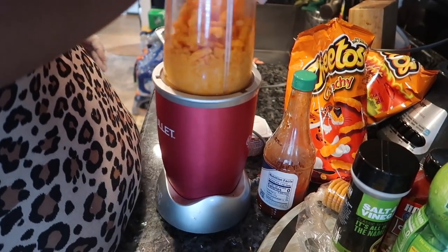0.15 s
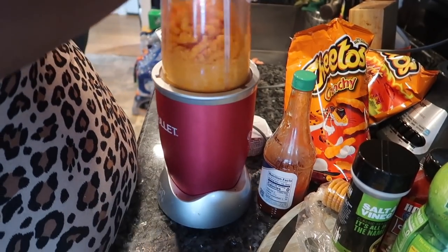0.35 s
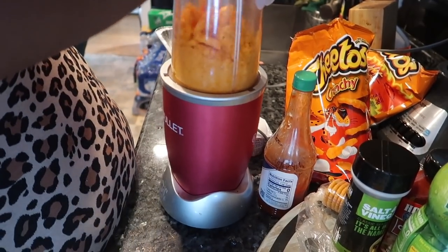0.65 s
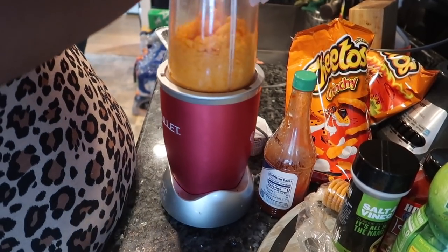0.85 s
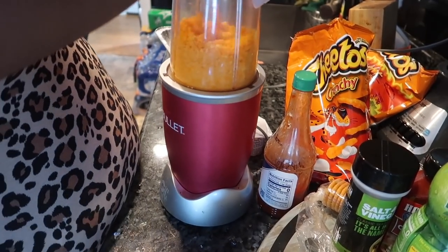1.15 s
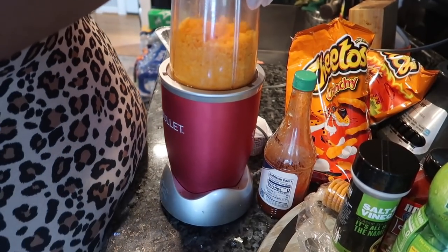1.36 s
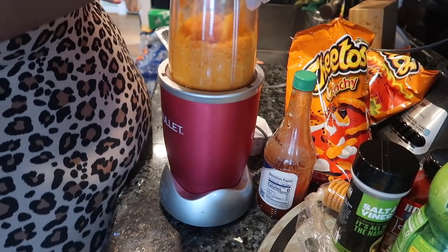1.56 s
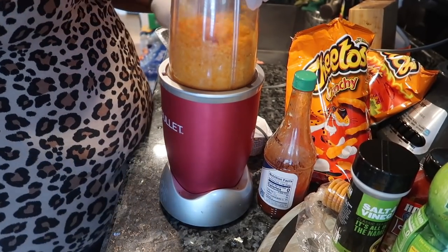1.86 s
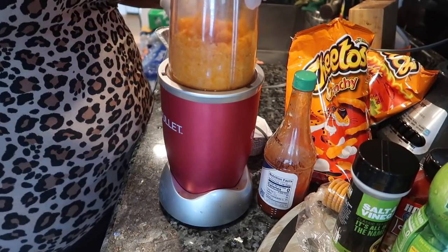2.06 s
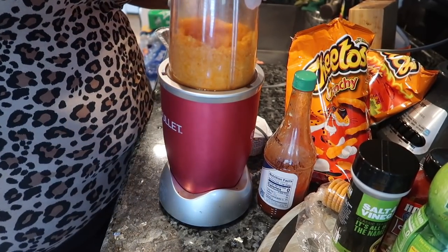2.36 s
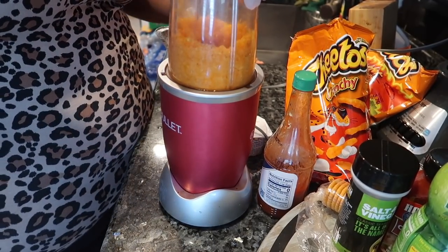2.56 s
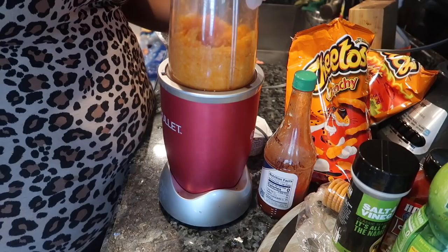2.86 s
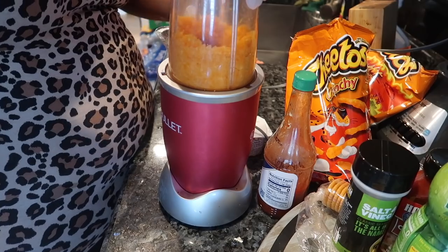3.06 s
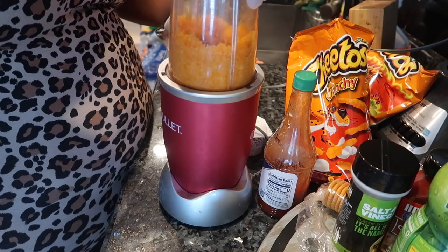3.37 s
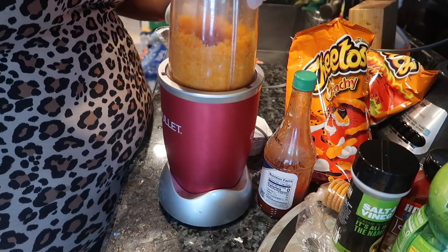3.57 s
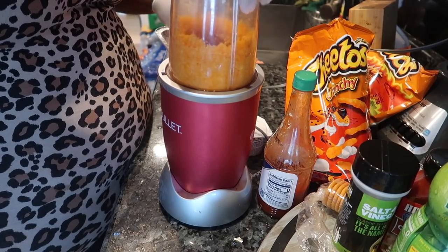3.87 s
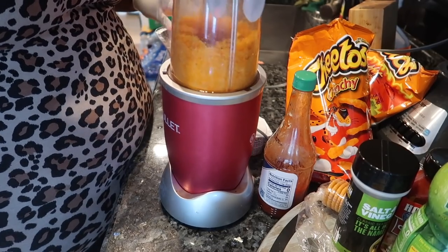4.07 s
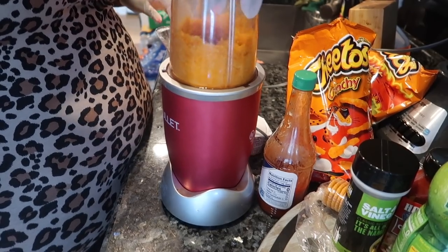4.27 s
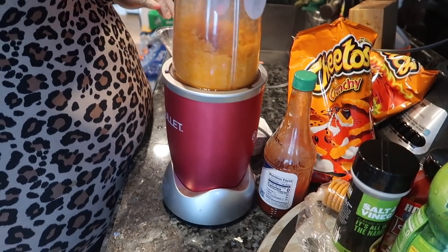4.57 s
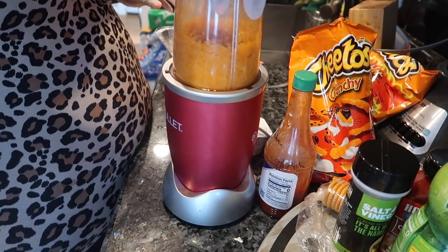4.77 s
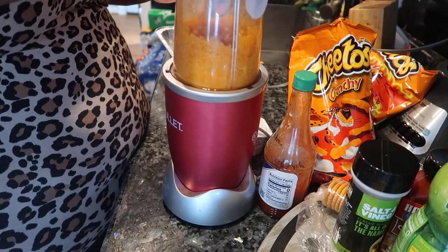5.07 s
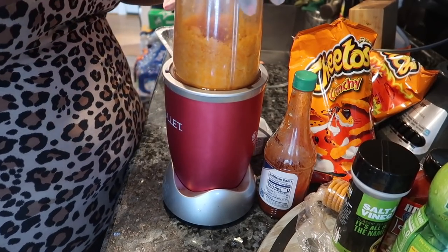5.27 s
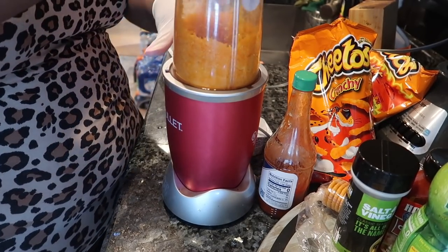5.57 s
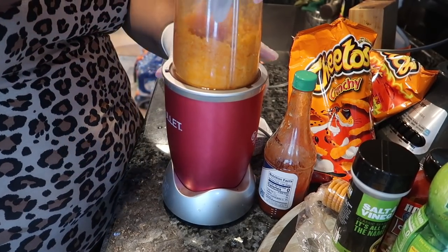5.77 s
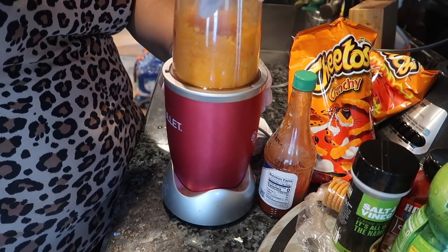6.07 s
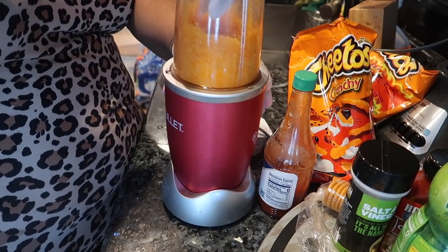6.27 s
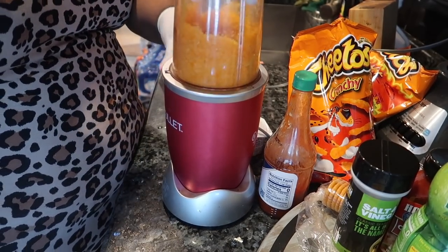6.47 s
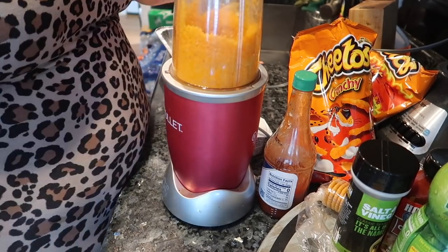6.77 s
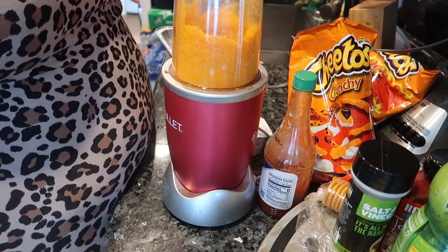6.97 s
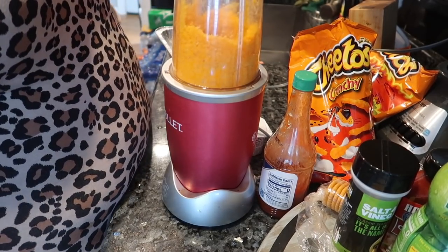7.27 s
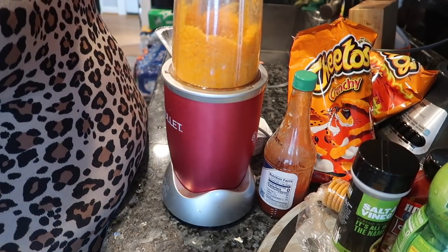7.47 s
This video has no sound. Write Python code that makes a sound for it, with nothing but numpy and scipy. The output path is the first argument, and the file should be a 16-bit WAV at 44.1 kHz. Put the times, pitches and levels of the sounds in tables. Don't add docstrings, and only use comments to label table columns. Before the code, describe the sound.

A small cup blender is already running, loud and very close to a phone on a stone kitchen counter. From 0 to 1 s the motor sags from a strained buzz to a lower pitch while dry puffed snacks crack coarsely on blade and cup. Until about 2.6 s it labours unevenly, with hard knocks, hollow plastic ringing and a dense, gritty roar. From 3 to 4.2 s the pitch climbs clearly as pieces become finer, the load lurching in quick bumps. From 4.2 to 6.1 s it runs fast and freer, smoother but fierce, with a piercing bearing whine, airy fan hiss and brief seat rattles. At about 6.2 s a sharp click and jolt mark the release; current stops and the whine glides steadily downward, roar and hiss thinning, leftover crumbs rattling softly, still spinning when it ends around 7.6 s.

```python
import sys
import numpy as np
from scipy import signal
from scipy.io import wavfile

SR = 44100
rng = np.random.default_rng(int(sys.argv[2]) if len(sys.argv) > 2 else 0)


def voltage_ratio(decibels):
    exponent = np.asarray(decibels, float) / 20
    return 10 ** exponent


def master_out(mix):
    frames = np.transpose(np.atleast_2d(mix))
    ceiling = np.clip(frames, -1, 1)
    pcm = np.round(ceiling * 32767).astype(np.int16)
    wavfile.write(sys.argv[1], SR, pcm)


N = 336384
T = np.arange(N) / SR
RELEASE_S, CUT_S = 6.17, 6.27


def noise():
    return rng.standard_normal(N)


def ramp(x):
    return np.clip(x, 0, 1)


def rms_one(x):
    return x / np.sqrt(np.mean(x ** 2) + 1e-20)


def in_time(rows):
    s, *columns = np.transpose(rows)
    return [np.interp(T, s, c) for c in columns]


def drift(rate):
    r = np.exp(-80 * np.pi * rate / SR)
    slow = signal.lfilter([1], [1, -2 * r, r * r], rng.standard_normal(N // 40 + 2002))[2000:]
    return np.interp(np.arange(N) / 40, np.arange(len(slow)), rms_one(slow))


def resonate(x, hz, width_hz):
    r = np.exp(-np.pi * width_hz / SR)
    zeros = np.array([1, 0, -1]) * (1 - r * r) / 2
    return signal.lfilter(zeros, [1, -2 * r * np.cos(2 * np.pi * hz / SR), r * r], x)


def body(x, modes, free, coasting, flicker_db=1.8):
    out = 0
    for k, (hz, width_hz, buried_db, clear_db, idle_db) in enumerate(modes):
        db = buried_db + free * (clear_db - buried_db) + coasting * (idle_db - buried_db)
        gain = voltage_ratio(db + flicker_db * drift(15.2))
        out = out + (-1) ** k * gain * resonate(x[k % len(x)], hz, width_hz)
    return rms_one(out)


def banded_noise(spectrum, patchy_db):
    hz, db = np.transpose(spectrum)
    edges = 25 * 2 ** np.arange(0, 9.4, 1 / 3)
    edges = edges[(edges > hz[0] / 1.3) & (edges < hz[-1] * 1.3)]
    white, out = rng.standard_normal((2, N)), 0
    for k, (low, high) in enumerate(zip(edges, edges[1:])):
        sos = signal.butter(2, [low, high], "band", fs=SR, output="sos")
        band_db = np.interp(np.log(low * high) / 2, np.log(hz), db) + patchy_db * drift(18.0)
        out = out + signal.sosfilt(sos, white[k % 2]) * voltage_ratio(band_db)
    return rms_one(out)


def tone(turns, multiple, db, wobble_db, blur, blur_rate=25):
    phase = 2 * np.pi * (multiple * turns + rng.random()) + blur * drift(blur_rate)
    return np.sqrt(2) * voltage_ratio(db + wobble_db * drift(13.7)) * np.sin(phase)


# (time [s], speed [turns per s])
DRIVEN_SPEED = [(0.0, 230), (0.45, 224), (0.62, 210), (1.0, 187), (1.25, 202), (1.5, 190.5), (1.63, 199),
                (1.9, 200), (2.12, 193.5), (2.26, 200), (2.6, 194), (3.25, 212), (4.0, 255), (4.23, 278),
                (4.88, 277.5), (5.25, 294), (5.6, 298), (6.27, 297.5)]


def rotor_speed():
    drag_s, friction = 1.83, 100
    driven, = in_time(DRIVEN_SPEED)
    off_s = np.maximum(T - CUT_S, 0)
    return (driven + friction) * np.exp(-off_s / drag_s) - friction


# (time [s], level [dB])
LOAD_LURCHES = [(0.824, 4), (0.886, -2.5), (0.968, 4.5), (1.044, -3.5), (1.181, -4), (1.271, 3), (1.475, 4),
                (1.521, -2.3), (1.576, 3.5), (1.672, 1), (1.774, -6), (1.904, 1), (2.241, 4.5), (2.508, -5),
                (2.806, 2.5), (3.622, 1.8), (3.664, -3), (3.7, 4.5), (3.799, -4.5), (3.915, 4.5),
                (4.045, -6), (4.234, 1.8), (4.344, 7), (4.472, -3.5), (4.805, 5), (4.983, -3), (5.374, 0.5),
                (5.655, -2.5), (6.19, 5.5), (7.387, 3.3)]


def lurches():
    s = np.arange(0, N / SR, .002)
    db = sum(size * np.exp(-((s - at) / 0.014) ** 2 / 2) for at, size in LOAD_LURCHES)
    return 0.68 * np.interp(T, s, db) + 0.9 * drift(30)


# (speed [turns per s], imbalance [dB],
# twice a turn [dB], coupling knock [dB], bearing [dB])
ROTOR_ANSWER = [(91.5, -48, -35, -42, -60), (125, -45, -50, -43, -58), (170, -31.5, -48, -43, -57),
                (212, -32, -41.5, -40.5, -37), (228, -26, -44, -37, -29), (250, -33, -38, -42, -28),
                (281, -29.5, -40, -44.5, -28.5), (288, -29.5, -32.5, -40, -24.5),
                (301.5, -25.5, -28, -31, -25.5)]


def line_levels(speed, coasting):
    at, *columns = np.transpose(ROTOR_ANSWER)
    first_db, second_db, knock_db, bearing_db = (np.interp(speed, at, c) for c in columns)
    first_db = first_db - 5.5 * ramp(2 * coasting)
    kick_s = np.where(T < CUT_S, .04, .09)
    kick_db = 8 * np.exp(-((T - CUT_S) / kick_s) ** 2 / 2)
    buried = ramp((4.05 - T) / .15)
    knock_db = knock_db + kick_db - 8.5 * buried
    not_singing = ramp((4.62 - T) / .5)
    unloaded = ramp(np.minimum(T - RELEASE_S + .06, RELEASE_S + 0.42 - T) / .04)
    bearing_db = bearing_db - 16 * not_singing - 15 * unloaded
    rings = (T < CUT_S) * np.clip((T - 2.4) / .15, .4, 1)
    slot_db = -47 + 22.5 * rings * np.exp(-((12 * speed - 2505) / 105) ** 2 / 2)
    return first_db, second_db + kick_db, knock_db, bearing_db, slot_db


# (multiple of turn rate, driven level [dB], released level [dB])
COUPLING_KNOCK = [(3, 2.5, -5), (4, -16, -3.5), (5, 5.5, 2.5), (6, -1, 2.5), (7, -6.5, -17), (8, 1.5, 0),
                  (9, -20, -0.5), (10, -2, 2), (11, -1, -38)]


def motor(turns, first_db, second_db, knock_db, bearing_db, slot_db):
    released = ramp((T - RELEASE_S) / 0.022)
    fading = 0.72 * ramp((T - 6.3) / .06)
    out = tone(turns, 1, first_db, wobble_db=1.0, blur=0.072)
    out += tone(turns, 2, second_db, wobble_db=1.5, blur=0.22)
    for multiple, driven_db, free_db in COUPLING_KNOCK:
        db = knock_db + driven_db + released * (free_db - driven_db) - multiple * fading
        out += tone(turns, multiple, db, wobble_db=3.0, blur=0.13)
    out += tone(turns, 5.36, bearing_db, wobble_db=3.5, blur=0.14)
    return out + tone(turns, 12, slot_db, wobble_db=1.5, blur=.3)


# (multiple of turn rate, level on axis [dB], level across the microphone ports [dB])
BRUSH_WHINE = [(24, -53, -66), (36, -61, -58), (48, -61, -57), (60, -70, -61), (72, -68, -59),
               (96, -68, -59)]
# (frequency [Hz], level [dB])
VENT_RESPONSE = [(4000, -21), (6000, -1), (7200, 2), (8200, -7), (9500, -1.5), (11000, -6), (12500, -13),
                 (14000, -28)]


def commutator(turns, speed, power_db):
    out = np.zeros((2, N))
    for multiple, on_db, across_db in BRUSH_WHINE:
        db = power_db + np.interp(multiple * speed, *np.transpose(VENT_RESPONSE), right=-90)
        whine = tone(turns, multiple, db, wobble_db=2.0, blur=1.6, blur_rate=150)
        out += voltage_ratio([[on_db], [across_db]]) * whine
    return out


# (frequency [Hz], width [Hz], buried [dB], free [dB], coasting [dB])
CUP_MODES = [(1240, 200, -13.5, -17, 4), (1500, 210, -1.5, -11, 7.5), (1777, 224, 0.5, -5, -7),
             (2270, 210, -9, 7.5, 2), (2435, 160, -2, 0, 8), (2950, 277, 0.5, -1.5, -12),
             (3524, 220, -9.5, 0, -4), (4750, 700, -20, -22, -21)]


def crumbs(turns, per_s, *stage):
    sweep = 1 + .5 * np.cos(2 * np.pi * turns)
    sizes = voltage_ratio(2.45 * np.minimum(rng.exponential(1, (2, N)), 4)) * rng.choice([-1, 1], (2, N))
    born = rng.random((2, N)) < per_s * sweep * voltage_ratio(3.5 * drift(14)) / SR
    dull = signal.butter(12, 5200, fs=SR, output="sos")
    return body(signal.sosfilt(dull, sizes * born + 1e-18), CUP_MODES, *stage)


# (frequency [Hz], level [dB per Hz])
ROAR_COLOUR = [(700, -9.5), (1000, -1), (1500, -5.5), (2500, 1.5), (3200, -7), (4000, -17), (5000, -26.5),
               (6000, -77)]
# (frequency [Hz], width [Hz], buried [dB], free [dB], coasting [dB])
HOUSING_MODES = [(1233, 130, 0, -12.5, -1), (1518, 110, 3, -8.5, 2), (1750, 190, 0.5, -7, 3),
                 (2062, 28, 2.5, 5.5, 0.5), (2525, 114, 3.5, -5, -3), (3220, 390, -5, -8.5, -5.5)]


def roar(turns, *stage):
    shaking = signal.sosfilt(signal.butter(4, 4500, fs=SR, output="sos"), noise())
    shaken = voltage_ratio(-6 * stage[1]) * banded_noise(ROAR_COLOUR, patchy_db=1.0)
    shaken = shaken + voltage_ratio(0.5) * body([shaking], HOUSING_MODES, *stage)
    return rms_one(shaken * (1 + 0.15 * np.cos(2 * np.pi * turns)))


# (frequency [Hz], level [dB per Hz])
DRONE_COLOUR = [(30, -25), (60, -19.5), (100, -18), (200, -8), (280, -12), (385, 5), (520, -9.5),
                (630, 9.5), (760, -7), (1000, -10), (1300, -4)]


def drone():
    return banded_noise(DRONE_COLOUR, patchy_db=1.5)


def hiss_level(speed, coasting):
    fan_db = -38 + 24 * np.log2(speed / 300)
    db = 10 * np.log10(voltage_ratio(fan_db) ** 2 + voltage_ratio(-47) ** 2)
    return db - 6.5 * ramp((T - RELEASE_S) / .05) * (1 - coasting)


# (frequency [Hz], level [dB per Hz])
HISS_COLOUR = [(3500, 3.5), (5000, 9), (6000, -11), (7100, 2.5), (8000, 3), (8800, -15.5), (12000, -13),
               (14000, -23.5), (15500, -33)]


def fan_hiss(hiss_db, free, coasting):
    singing = rms_one(resonate(noise(), 7070, 150))
    out = voltage_ratio(hiss_db + 4.0) * banded_noise(HISS_COLOUR, patchy_db=2.0)
    return out + voltage_ratio(hiss_db - 10.5 - 3 * free - 11 * coasting) * singing


# (frequency [Hz], level [dB per Hz])
ACROSS_COLOUR = [(100, -53), (290, -13), (510, -5), (900, -25), (1520, -32), (2370, -14), (4900, -2),
                 (5700, -8.5), (10900, -12), (13000, -26), (15500, -37)]


def fan_hiss_across(hiss_db, free):
    out = voltage_ratio(hiss_db) * banded_noise(ACROSS_COLOUR, patchy_db=1.0)
    return out + voltage_ratio(hiss_db - 13 - 8 * free) * rms_one(resonate(noise(), 7440, 200))


def spray():
    return rms_one(resonate(resonate(noise(), 4460, 1200), 4460, 1200))


# (time [s], peak level [dB], frequency [Hz])
HARD_CRACKS = [(0.085, -14, 1500), (0.2044, -17, 1540), (0.2488, -2, 2280), (0.4609, -4, 2600),
               (0.7598, -2, 1750), (1.3094, -2, 1910), (1.6634, -4, 1600), (1.807, -3.5, 2670),
               (1.833, -4, 1460), (2.0488, 1, 2500), (2.133, -2, 2470), (2.225, -2, 2410),
               (2.4718, 0, 1550), (3.5084, -22, 2550), (3.572, -1, 2550), (6.186, 3, 1526)]


def cracks():
    out, t = np.zeros(N), np.arange(1500) / SR
    for s, db, hz in HARD_CRACKS:
        debris = resonate(rng.standard_normal(1500), hz, 1200)
        hit = np.sin(2 * np.pi * hz * t) * np.exp(-t / 0.0069) + 1.2 * debris * np.exp(-t / 0.0052)
        i = round(s * SR)
        out[i:i + 1500] += voltage_ratio(db - 10.5) * hit
    return signal.sosfilt(signal.butter(2, [800, 6000], "band", fs=SR, output="sos"), out)


# (time [s], length [s], frequency [Hz], width [Hz], level [dB])
NARROW_RINGS = [(4.13, 0.04, 530, 34, -27), (4.23, 0.21, 520, 56, -25.5), (5.2, 0.16, 560, 59, -29),
                (4.72, 0.19, 530, 33, -28.5), (4.55, 0.13, 129, 15, -37.5), (4.3, 0.059, 127, 12, -43),
                (7.47, 0.095, 60, 22, -39), (7.08, 0.63, 396, 82, -32.5), (1.8, 1.1, 2500, 190, -25),
                (5.0, 1.2, 2140, 220, -26), (4.1, 1.04, 63, 37, -51), (0.18, 0.98, 62, 28, -53.5),
                (7.1, 0.42, 144, 190, -40), (6.165, .05, 1100, 68, -23), (6.17, 0.044, 1490, 53, -21),
                (4.56, 0.12, 567, 81, -29), (4.2, 0.16, 1772, 22, -29), (4.4, 0.17, 128, 20, -43),
                (6.07, .1, 130, 18, -39.5)]


def rattle():
    out = np.zeros(N)
    for s, length, hz, width_hz, db in NARROW_RINGS:
        span = (T > s) & (T < s + length)
        count = span.sum()
        ringing = rng.standard_normal(count + 4000)
        ringing = resonate(resonate(ringing, hz, width_hz), hz, width_hz)[-count:]
        swell = np.sin(np.pi * (T[span] - s) / length) ** 0.29
        out[span] += voltage_ratio(db) * rms_one(ringing) * swell
    return out


# (time [s], blade running free [0-1], coasting [0-1], overall effort [dB],
# share of coarse pieces [dB])
GRIND_STAGES = [(0, 0.2, 0.18, 1, 3.5), (1.5, 0.01, 0.06, 0, 0), (3.0, 0, 0, -0.5, -3),
                (3.6, 0.1, 0, 0, -6.5), (4.1, 0.77, 0.12, -1, -11.5), (4.9, .8, 0.01, 1, -6.5),
                (5.9, 1, 0, 1, -3), (6.25, 0.5, 0.3, -0.5, 2), (6.35, 0.45, 0.1, -3.5, -4),
                (6.5, 0.5, 0.7, -5.5, -10), (6.65, 0.15, 0.45, -4.5, -5), (7.0, 0.2, 1, -6.5, -3),
                (7.35, 0, 0.94, -6, -3), (7.63, 0.2, 0.4, -9, -3.5)]


def scene():
    speed = rotor_speed()
    turns = np.cumsum(speed) / SR
    free, coasting, effort_db, coarse_db = in_time(GRIND_STAGES)
    lurch_db = lurches()
    crumb_db = -20 + effort_db + coarse_db + lurch_db
    roar_db = -20 + effort_db - 0.32 * coarse_db + lurch_db
    drone_db = -28.5 + free + 0.52 * effort_db + 0.83 * lurch_db
    hiss_db = hiss_level(speed, coasting)

    mid = motor(turns, *line_levels(speed, coasting))
    whine, whine_across = commutator(turns, speed, power_db=-1.5 * coasting)
    mid += voltage_ratio(crumb_db - 2.0) * crumbs(turns, 1200, free, coasting)
    mid += voltage_ratio(roar_db - 0.5) * roar(turns, free, coasting)
    mid += voltage_ratio(drone_db - 1.5) * drone()
    mid += fan_hiss(hiss_db, free, coasting)
    mid += cracks() + rattle()
    mid -= 0.53 * resonate(mid, 737, 125)
    mid = whine + mid - .7 * resonate(mid, 8280, 4500)

    side = whine_across + fan_hiss_across(hiss_db, free)
    side += voltage_ratio(crumb_db - 21.5 - 6.7 * free) * spray()
    side -= voltage_ratio(-23) * resonate(mid, 1600, 480)
    return np.array([mid + side, mid - side])


def low_pass(x):
    return signal.sosfilt(signal.butter(12, 15180, fs=SR, output="sos"), x)


def record(dry):
    held = dry / (1 + dry ** 6) ** (1 / 6)
    return low_pass(held)


dry = scene()
out = record(dry)
master_out(out)
```